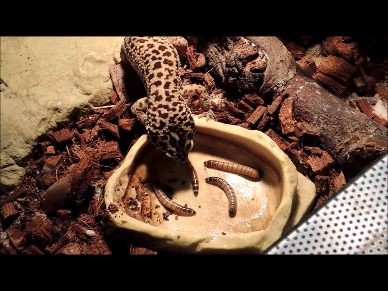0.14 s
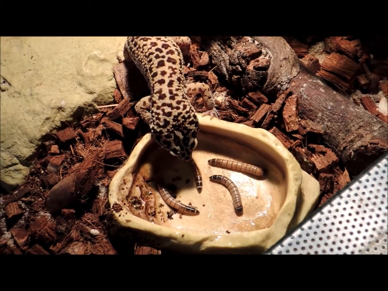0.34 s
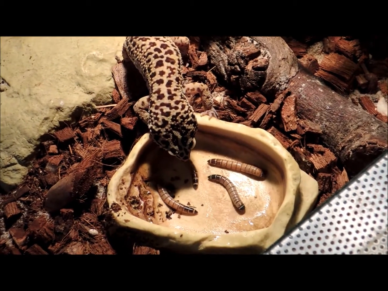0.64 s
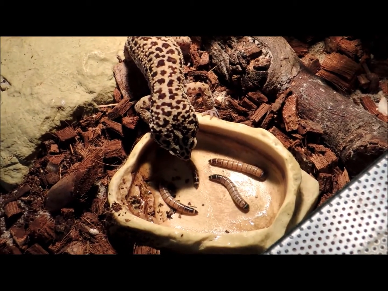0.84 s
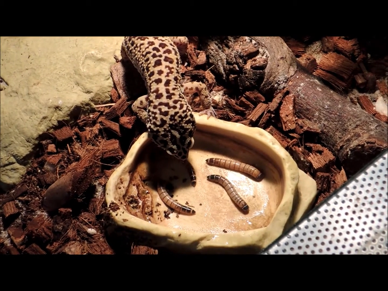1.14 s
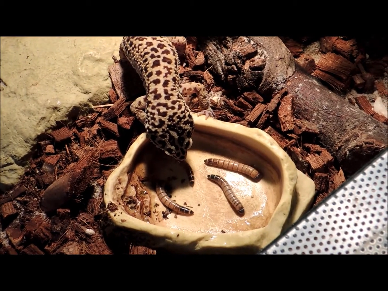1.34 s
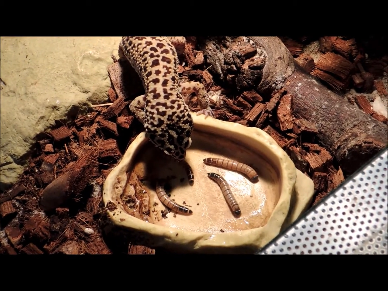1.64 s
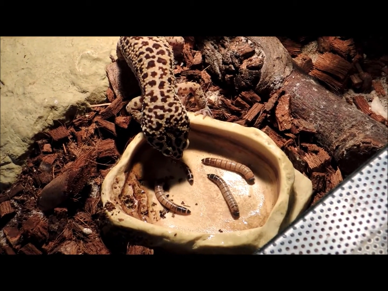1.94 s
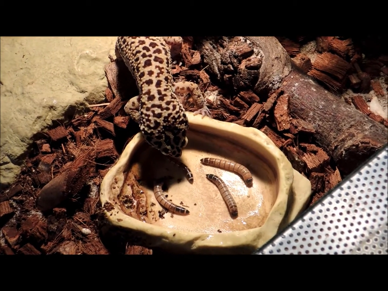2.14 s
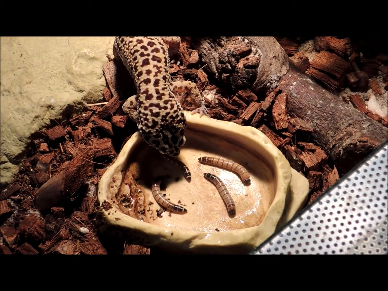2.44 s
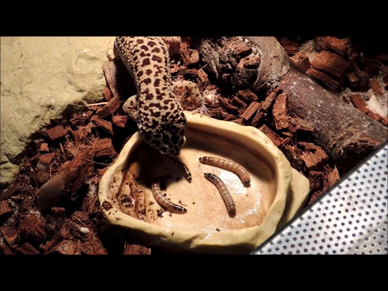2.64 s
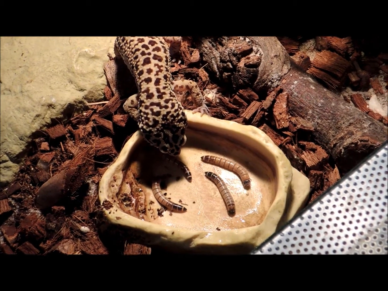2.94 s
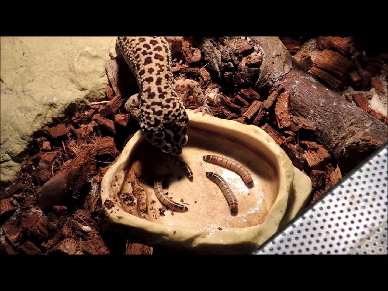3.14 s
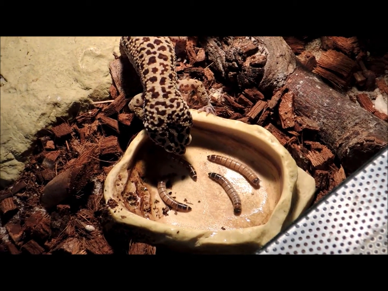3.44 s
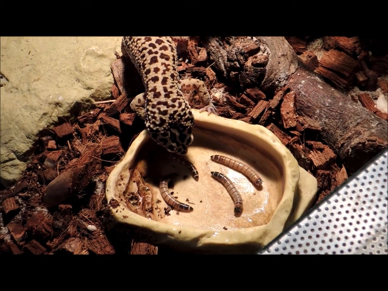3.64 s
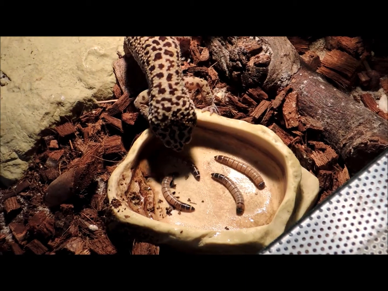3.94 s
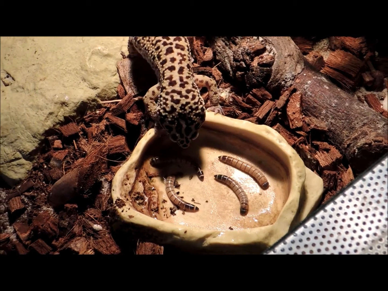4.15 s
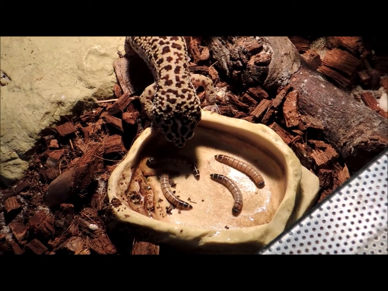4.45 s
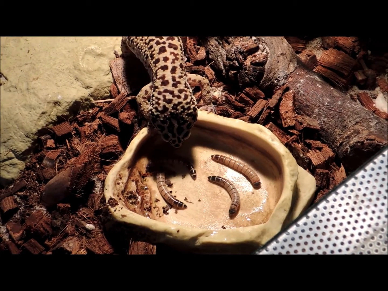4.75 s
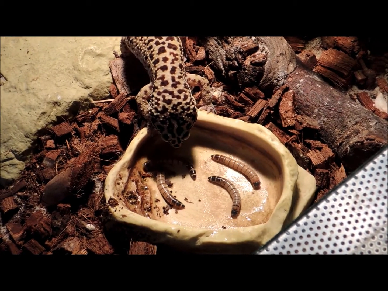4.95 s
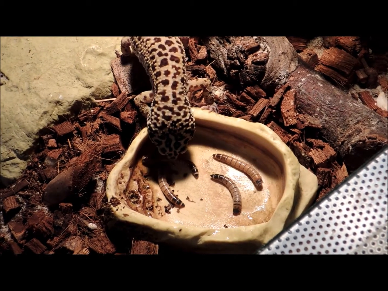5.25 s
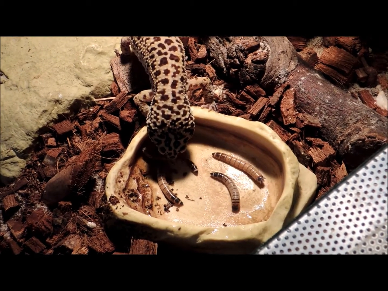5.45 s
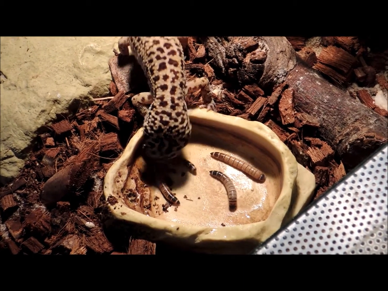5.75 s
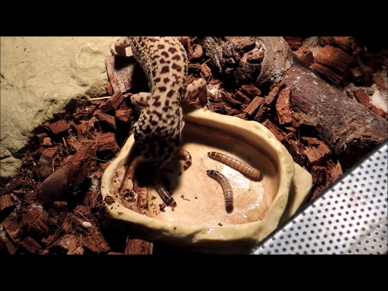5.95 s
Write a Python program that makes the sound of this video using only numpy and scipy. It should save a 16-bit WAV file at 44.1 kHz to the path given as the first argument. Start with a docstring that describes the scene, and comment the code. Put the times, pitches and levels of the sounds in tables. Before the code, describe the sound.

Three loud knocking clatters near the start, the middle one harshest, followed by quiet small taps and rustling in a hushed room with a ticking clock.

```python
"""Clatter by a terrarium, with a clock

Something hard and hollow clatters three times close by: gritty bursts of noise ring a set of resonances.
Small taps, two-sided noise swelling into rustles, very high snaps and soft low thumps join it.
A pendulum clock ticks unevenly across the quiet room: groups of short ringing knocks, mostly echo.
Behind it all lie a fan-like hush of shaped noise and a mains hum of one wavering sine.
"""
import sys
import numpy as np
from scipy import signal
from scipy.fft import rfft, irfft
from scipy.io import wavfile
from scipy.ndimage import uniform_filter1d

SR = 44100
rng = np.random.default_rng(int(sys.argv[2]) if len(sys.argv) > 2 else 0)


def generate_wav(sig):
    """Save sig (samples, or channels by samples) to the path in sys.argv[1] as 16-bit PCM at SR."""
    pcm = np.round(np.clip(np.atleast_2d(sig).T, -1, 1) * 32767).astype(np.int16)
    wavfile.write(sys.argv[1], SR, pcm)


N = 269451  # length in samples


def gain_of(db):
    """Turns decibels into a factor on the sound pressure."""
    return 10 ** (np.asarray(db) / 20)


def evened(x):
    """Scales a sound to an average (rms) level of 1."""
    return x / np.sqrt(np.mean(x ** 2) + 1e-20)


def read(points, hz):
    """Reads a table between its points, along a log-frequency axis."""
    point_hz, value = np.transpose(points)
    return np.interp(np.log(hz + 1), np.log(point_hz + 1), value)


def add(mix, start_s, sound):
    """Mixes a sound in at a start time, cutting off what falls outside."""
    at = round(start_s * SR)
    part = mix[..., max(at, 0):][..., :sound.shape[-1] + min(at, 0)]
    part += sound[..., max(-at, 0):][..., :part.shape[-1]]


def sides(lean_db):
    """Gives left and right gains for a level difference, left minus right."""
    return gain_of(np.array([lean_db / 2, -lean_db / 2]))


def paired(a, b, likeness, hz):
    """Mixes two unrelated spectra into a left and a right that are partly alike."""
    same = np.clip(read(likeness, hz), -1, 1)
    return np.array([a, same * a + np.sqrt(1 - same ** 2) * b])


def slow(count, top_hz):
    """Wanders at random over the whole scene: a sum of sines, the slower the larger."""
    t = np.arange(count) * N / count / SR
    total = 0
    for f in np.geomspace(.2, top_hz, num=24):
        total = total + np.sin(2 * np.pi * (f * t + rng.random())) / np.sqrt(f)
    return evened(total)


# Pitch bands that colour a contact. Each row: lower edge in Hz, upper edge in Hz.
COLOUR_BANDS = [(250, 600), (600, 1050), (1050, 1800), (1800, 3500), (3500, 6500), (6500, 13000)]
BAND_OCT = np.log2(np.sqrt(np.prod(COLOUR_BANDS, axis=1)) / 400)  # band middles, octaves above 400 Hz
# How long each of those bands lasts. Each entry: factor on the contact's fade time.
BAND_FADE_SHARE = [1.05, 1.44, 1.16, 1.62, 1.7, 1.7]
# Resonances of the struck object. Each row: pitch in Hz, level in dB,
# time to fade by 60 dB in seconds (held between .01 and .07 when played).
OBJECT_MODES = [(446, 21, 0.025), (690, -1.5, 0.023), (885, 9.5, 0.016), (1294, 5, 0.031), (1455, 6, 0.032),
                (1597, -4, 0.034), (2160, -5.5, 0.056), (2380, 0.5, 0.043), (2700, 1, 0.018),
                (3600, -21, 0.027), (4800, 7, 0.018), (5800, 11.5, 0.0076)]
# How alike left and right are for near sounds and echoes. Each row: pitch in Hz, likeness from 0 to 1.
NEAR_LIKENESS = [(60, 0.056), (180, 1), (530, 0.95), (1570, 0.99), (4650, 0.63), (13800, 0.11)]
STEEPER_ABOVE = 1.27  # the colour falls this much faster above its strongest pitch than below
TREBLE_FROM_OCT = 3.6  # corner of the treble shelf, octaves above 400 Hz
TREBLE_SLOPE_DB, TREBLE_DROOP_DB = 8.5, 0.5  # shelf loss per octave below and above its corner


def contact_colour(top_oct, fall_db, treble_db):
    """Gives each band its gain: a hump around the strongest pitch plus a treble shelf."""
    below = np.maximum(TREBLE_FROM_OCT - BAND_OCT, 0)
    above = np.maximum(BAND_OCT - TREBLE_FROM_OCT, 0)
    shelf_db = -TREBLE_SLOPE_DB * below - TREBLE_DROOP_DB * above
    distance = np.maximum(top_oct - BAND_OCT, STEEPER_ABOVE * (BAND_OCT - top_oct))
    return gain_of(-fall_db * distance) + gain_of(treble_db + shelf_db)


def contacts(rows, lean_db, dry_db, grit_db, click_db):
    """Each contact is a click and a gritty burst that ring the object's modes, band by band."""
    length = 6144
    out, t, hz = np.zeros((2, N)), np.arange(length) / SR, np.fft.rfftfreq(length, 1 / SR)
    bands = [signal.butter(3, edge, "bandpass", fs=SR, output="sos") for edge in COLOUR_BANDS]
    mode_hz, mode_db, mode_t60 = np.transpose(OBJECT_MODES)[..., None]
    mode_fade = gain_of(mode_db - 60 * t / np.clip(mode_t60, .01, .07))
    modes = mode_fade * np.sin(2 * np.pi * mode_hz * t)
    for s, peak_db, top_oct, fall_db, treble_db, t60 in rows:
        roughness = gain_of(grit_db * rng.standard_normal(length // 32).repeat(32))
        grit = rng.standard_normal((2, length)) * roughness
        grit = irfft(paired(*rfft(grit), NEAR_LIKENESS, hz))
        grit[:, 0] += gain_of(click_db)
        body = gain_of(4.1 * rng.standard_normal(len(modes))) @ modes  # another spot each time
        body = body / np.linalg.norm(body)
        body[0] = gain_of(dry_db)  # the contact itself, heard beside the ring
        burst = 0
        for band, gain, share in zip(bands, contact_colour(top_oct, fall_db, treble_db), BAND_FADE_SHARE):
            fading = grit * gain_of(-60 * t / (share * t60))
            rung = signal.fftconvolve(fading, body[None, :3072], axes=1)[:, :length]
            burst = burst + gain * evened(signal.sosfilt(band, rung))
        burst = burst / abs(burst).max()
        add(out, s, gain_of(peak_db) * sides(lean_db)[:, None] * burst)
    return out


# Contacts of the clattering object. Each row: start in seconds, peak level in dB,
# strongest pitch in octaves above 400 Hz, fall-off in dB per octave, treble in dB,
# basic time to fade by 60 dB in seconds.
CLATTER_CONTACTS = [(.6675, -2.5, 0.6, 2.5, -16.5, 0.024), (.6745, -11, 1.26, 9.5, -1.5, 0.093),
                    (.8395, -23.5, 1.2, 7.5, -25, 0.05), (.8585, -22, 1, 9.5, -18, .012),
                    (.872, -20, 0.94, 9, -24, 0.033), (.878, -21, 1.2, 4.5, -22, 0.036),
                    (.894, 8, 3.04, 7, -10, 0.063), (.901, 3, 1.43, 14, 8, 0.051),
                    (.9095, -2, 1.5, 12, -8, 0.065), (1.014, -26, 4.5, 8, -6, 0.11),
                    (1.057, -32, 2.6, 6, -1, .064), (1.074, -33, 3.3, 1, 3, .15),
                    (1.106, -5, 1.99, 6.5, -46, 0.066), (1.1305, -6, 1.75, 18, -29, 0.025),
                    (1.1355, -11, 1.54, 11.5, -28, 0.062), (1.144, -17.5, 3.17, 10, -22, 0.067)]


def clatter():
    """A hard, hollow object knocks in quick groups, each contact with a strong click."""
    return contacts(CLATTER_CONTACTS, lean_db=-0.8, dry_db=5.5, grit_db=1.0, click_db=19.5)


# Small taps. Each row: start in seconds, peak level in dB, strongest pitch in octaves above 400 Hz,
# treble in dB, basic time to fade by 60 dB in seconds.
SMALL_TAPS = [(.118, -31.5, 1.24, -10, 0.09), (.384, -34, 1.5, 3, .12), (.496, -29.5, 1.5, -12.5, 0.086),
              (.504, -34.5, 0, 5, 0.077), (1.313, -35.5, 3.5, -6, 0.1), (1.514, -33, 0, -7, 0.079),
              (1.588, -36.5, 0.5, -7, .05), (1.627, -31.5, 2, -8, 0.13), (1.662, -37, 0, 0, .1),
              (1.766, -35, 1.8, -9, .1), (1.851, -28, 1.73, -14.5, 0.072), (1.952, -31.5, 1.6, -8, 0.061),
              (1.994, -38.5, 0.5, -21, 0.16), (2.086, -33.5, 4.5, 0, .061), (2.17, -25, 1.64, -7, .06),
              (2.499, -41.5, 1.2, -7, 0.061), (2.705, -37.5, 2, -14, .12), (3.202, -33.5, 3, -10, 0.13),
              (3.486, -32.5, 2.5, -6, 0.077), (3.659, -28, 2.5, -13, .15), (4.086, -34, 3.5, -4, .046),
              (4.381, -35, 3.5, 0, 0.066), (4.425, -27.5, 3, -9, 0.18), (4.901, -36.5, 0, -1, 0.23),
              (5.13, -36, 1.5, -8, 0.12), (5.325, -38, 5, -10, 0.1), (5.482, -32, 2.5, 1, 0.16),
              (5.534, -38, 3, -14, .06), (5.775, -32, 1.6, -20, 0.15), (5.78, -30, 1.7, -11, .15),
              (6.046, -37, 1.5, -1, .091)]


def small_taps():
    """Lighter contacts ring the same modes, with rougher grit and a weaker click."""
    fall_db = 8  # per octave
    rows = [(s, db, top_oct, fall_db, treble_db, t60) for s, db, top_oct, treble_db, t60 in SMALL_TAPS]
    return contacts(rows, lean_db=-1.0, dry_db=9, grit_db=4.5, click_db=8.5)


# Very high snaps, each with a short fizzing tail. Each row: start in seconds, peak level in dB,
# pitch in Hz, width in Hz, starting level of the fizz in dB.
HIGH_SNAPS = [(1.4978, -16.5, 8970, 1860, -41), (4.0872, -30, 11500, 2500, -56),
              (4.849, -37, 10000, 1500, -45)]
FIZZ_T60_S = 0.11


def snaps():
    """A few very high cycles swell and stop within a millisecond or so, then noise fizzes at that pitch."""
    out, t, after = np.zeros(N), np.arange(-40, 120) / SR, np.arange(4000) / SR
    for s, db, hz, width, fizz_db in HIGH_SNAPS:
        swell = np.exp(-(np.pi * width * t) ** 2 / 2)
        add(out, s, gain_of(db) * swell * np.sin(2 * np.pi * hz * t))
        band = signal.butter(2, (hz - width, hz + width), "bandpass", fs=SR, output="sos")
        fizz = evened(signal.sosfilt(band, rng.standard_normal(len(after))))
        add(out, s + .001, gain_of(fizz_db - 60 * after / FIZZ_T60_S) * fizz)
    return out


# Soft low bumps. Each row: start in seconds, level in dB, starting pitch setting in Hz,
# left minus right in dB.
LOW_THUMPS = [(4.932, -33.5, 66, -13), (4.981, -37.5, 70, -14), (5.177, -38, 50, -13),
              (5.521, -45, 45.5, -19)]


def thumps():
    """Each thump is a soft, dying push of pressure."""
    out = np.zeros((2, N))
    for s, db, hz, lean_db in LOW_THUMPS:
        turns = np.arange(4000) / SR * hz
        push = np.sin(2 * np.pi * turns ** 0.61) * np.exp(-1.5 * turns)  # quick rise, slower swing back
        add(out, s, gain_of(db) * sides(lean_db)[:, None] * push)
    return out


# Resonances of the clock case. Each row: pitch in Hz, width in Hz (wider dies faster), level in dB.
CLOCK_MODES = [(1440, 750, 0), (2135, 285, 0.5), (2262, 170, -6), (2564, 246, 2.5), (3780, 187, -4.5),
               (4070, 260, -4.5), (4700, 460, -8)]
SWING_S = 1.0718  # full pendulum period
FIRST_TICK_S, TOCK_AFTER_S = .597, .467  # the beat is uneven
TICK_DB, TOCK_DB = -35, -33  # before the bounces and the echo
CLOCK_LEAD_S = .1  # the clock's line starts this much early


def clock():
    """The escapement lands and bounces; the case rings a little differently each time."""
    t = np.arange(3000) / SR
    modes = []
    for f, width, db in CLOCK_MODES:
        swell_and_fade = width * t * np.exp(-np.pi * width * t)
        modes.append(gain_of(db) * swell_and_fade * np.sin(2 * np.pi * f * t))
    modes = np.array(modes)
    out = np.zeros(N + SR)
    swings = FIRST_TICK_S + SWING_S * np.arange(6)
    beats = [(s, TICK_DB) for s in swings] + [(s + TOCK_AFTER_S - SWING_S, TOCK_DB) for s in swings]
    for s, db in beats:
        for late_s, bounce_db in [(-.005, -7.5), (0, 7), (.007, -15.5), (.016, -6)]:
            case = gain_of(1.5 * rng.standard_normal(len(modes))) @ modes
            at = s + late_s + rng.uniform(-.001, .001) + CLOCK_LEAD_S
            add(out, at, gain_of(db + bounce_db) * case / abs(modes.sum(0)).max())
    return out


# How alike left and right are in the hush and rustles. Each row: pitch in Hz, likeness from 0 to 1.
AIR_LIKENESS = [(60, 0.3), (130, 0.82), (280, 0.02), (620, 0.74), (1340, 0.63), (2920, 0.35), (6350, 0.026),
                (13800, 0.06)]


def paired_noise(frames, hz):
    """Random spectra over time for left and right, partly alike."""
    a, b, c, d = rng.standard_normal((4, frames, len(hz)))
    return paired(a + 1j * b, c + 1j * d, AIR_LIKENESS, hz).transpose(0, 2, 1)


# Separate rustles. Each row: time of the peak in seconds, level in dB, build-up in seconds,
# fade in seconds (both for a change of 20 dB), level of the body under 5 kHz in dB on top of the level.
RUSTLES = [(1.32, -63, .04, .3, -2), (1.41, -50, 0.037, .03, 5), (1.51, -44, .03, .02, -7),
           (1.67, -52.5, 0.27, .18, 5), (1.84, -48, 0.11, 0.73, -1.5), (2.18, -45.5, .04, .12, 5),
           (2.52, -52.5, .07, 0.38, 4.5), (2.62, -60.5, .08, 0.088, 19.5), (2.72, -54, 0.13, 0.16, 10),
           (3.21, -60.5, .04, 1.2, 10), (3.5, -48, 0.11, 0.025, -5), (3.67, -54, .035, .08, 12),
           (4.09, -54, .027, .027, -6), (4.44, -44.5, 0.2, 0.094, 3), (4.77, -53, 0.53, .07, -20),
           (4.85, -49, .046, .4, -8), (5.23, -51.5, 1, .16, -2), (5.34, -51, .08, .3, -12),
           (5.54, -50.5, .5, .04, -3), (5.78, -55, 0.022, 0.066, 16), (6.04, -58, 0.3, .17, 7)]
# Colour of the rustles' top. Each row: pitch in Hz, relative level in dB per Hz.
TOP_COLOUR = [(3000, -2.5), (5000, -3.5), (9000, -0.5), (14000, -0.5)]
# Colour of the rustles' body. Each row: pitch in Hz, relative level in dB per Hz.
BODY_COLOUR = [(500, -7), (1200, 1), (3000, -6), (5500, -14)]


def rustle():
    """Noise with a top and a body builds up and fades, flickering from frame to frame."""
    frames, hz = N // 128 + 6, np.fft.rfftfreq(512, 1 / SR)
    t = np.arange(frames) * 128 / SR
    z = paired_noise(frames, hz)
    s, level_db, build_s, fade_s, body_db = np.transpose(RUSTLES)[..., None]
    swells = gain_of(level_db - 20 * np.maximum((s - t) / build_s, (t - s) / fade_s))
    top, body = gain_of(read(TOP_COLOUR, hz))[:, None], gain_of(read(BODY_COLOUR, hz))[:, None]
    unit = np.std(signal.istft(z * top, nperseg=512, noverlap=384)[1])  # so the top alone has rms 1
    flicker_db = 1.9 * rng.standard_normal(frames)
    # where rustles overlap, the loudest one counts
    shape = top * swells.max(0) + body * (swells * gain_of(body_db)).max(0)
    z *= shape * gain_of(flicker_db) / unit
    return signal.istft(z, nperseg=512, noverlap=384)[1][:, :N]


# Colour of the hush. Each row: pitch in Hz, relative level in dB per Hz.
HUSH_COLOUR = [(10, -17), (18, 3), (28, 4.5), (50, -3), (70, 0.5), (95, -8.5), (150, -10.5), (362, -8.5),
               (681, -17), (786, -9), (880, -10), (985, -6.5), (1100, -14.5), (1200, -17.5), (2410, -21.5),
               (2700, -19), (3600, -22), (11300, -25), (14200, -28.5)]
# Balance of the hush. Each row: pitch in Hz, left minus right in dB.
HUSH_BALANCE = [(20, -7), (40, -8.5), (80, 0.5), (150, -1), (370, -4.5), (1000, 0)]
HUSH_DB = -46.5  # rms


def hush():
    """Steady room and microphone noise, whose level wavers slightly in time and pitch."""
    frames, hz = N // 512 + 6, np.fft.rfftfreq(2048, 1 / SR)
    z = paired_noise(frames, hz)
    patches = rng.standard_normal((len(hz), frames))
    patches = uniform_filter1d(patches, size=20, axis=0)
    patches = evened(uniform_filter1d(patches, size=8, axis=1))
    level_db = read(HUSH_COLOUR, hz)[:, None] + 0.33 * patches + 0.25 * slow(frames, 2.6)
    z *= gain_of(level_db) * sides(read(HUSH_BALANCE, hz))[..., None]
    return gain_of(HUSH_DB) * evened(signal.istft(z, nperseg=2048, noverlap=1536)[1][:, :N])


HUM_HZ, HUM_DB = 99.6, -56  # the level is the rms it wavers around


def hum():
    """Mains hum: one low sine whose loudness wavers."""
    level = np.sqrt(2) * gain_of(HUM_DB + 1.1 * slow(N, 8))
    return level * np.sin(2 * np.pi * HUM_HZ * np.arange(N) / SR)


# How long the room echoes. Each row: pitch in Hz, time to fade by 60 dB in seconds.
ROOM_FADE = [(200, 0.48), (1000, 0.41), (3000, 0.28), (10000, 0.25)]


def room(x):
    """Echoes are sparse taps of random sign, each pitch dying at its own speed."""
    taps = np.zeros((2, SR // 2))
    starts = np.arange(80, SR // 2 - 20, 20)
    at = starts + rng.integers(0, 20, (2, len(starts)))
    np.put_along_axis(taps, at, rng.choice([-1., 1.], at.shape), 1)
    taps = irfft(paired(*rfft(taps), NEAR_LIKENESS, np.fft.rfftfreq(SR // 2, 1 / SR)))
    hz, t, z = signal.stft(taps, SR, nperseg=256)
    tail = signal.istft(z * gain_of(-60 * t / read(ROOM_FADE, hz)[:, None]), SR, nperseg=256)[1]
    return signal.fftconvolve(x[None], tail / np.linalg.norm(tail[0]), axes=1)[:, :len(x)]


def scene():
    """Near contacts with some echo, a far clock that is mostly echo, and the background."""
    near = clatter() + small_taps() + snaps()
    near_echo = gain_of(-13.0) * room(near.mean(0))
    far = clock()
    ticks = gain_of(-8.0) * far + gain_of(-1.5) * room(far)
    ticks = ticks[:, round(CLOCK_LEAD_S * SR):][:, :N]
    return near + near_echo + ticks + thumps() + rustle() + hush() + hum()


EDGE_HZ = 14330  # little is left above this


def record(dry):
    """The loudest blow overloads the input and is rounded off; then the highest treble is cut."""
    held = dry / (1 + dry ** 4) ** .25
    low_pass = signal.firwin(1023, EDGE_HZ, window=("kaiser", 9), fs=SR)
    return signal.oaconvolve(0.98 * held, low_pass[None], "same")


dry = scene()
out = record(dry)
generate_wav(out)
```